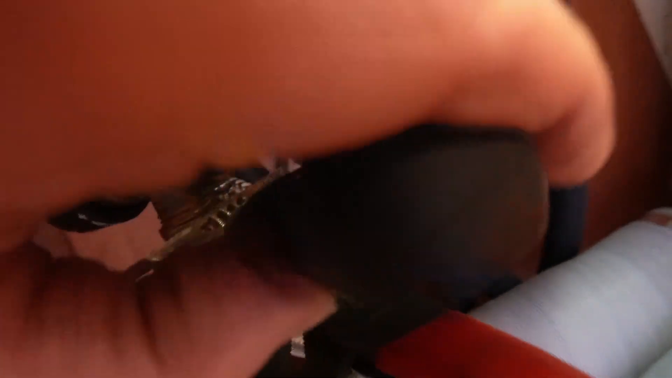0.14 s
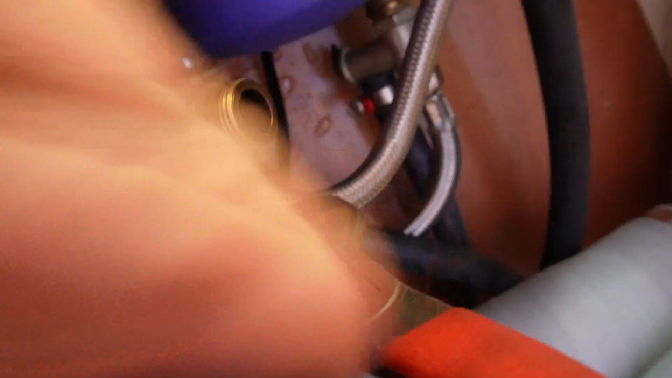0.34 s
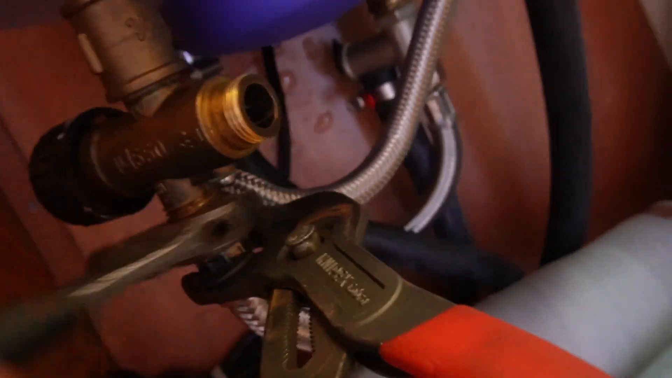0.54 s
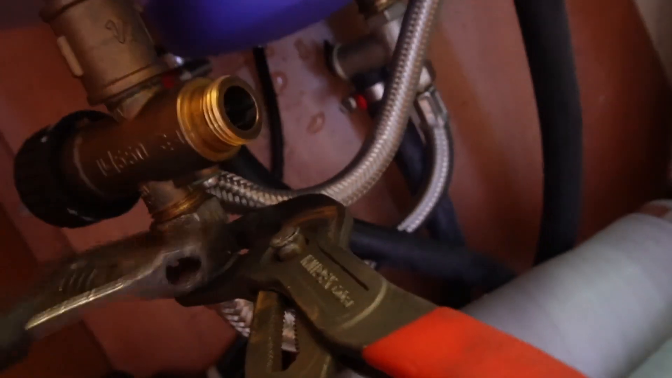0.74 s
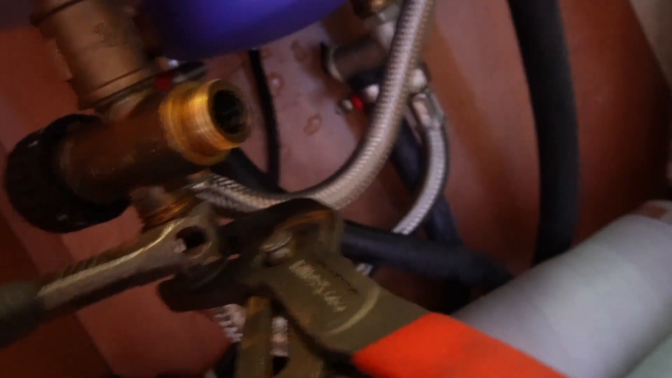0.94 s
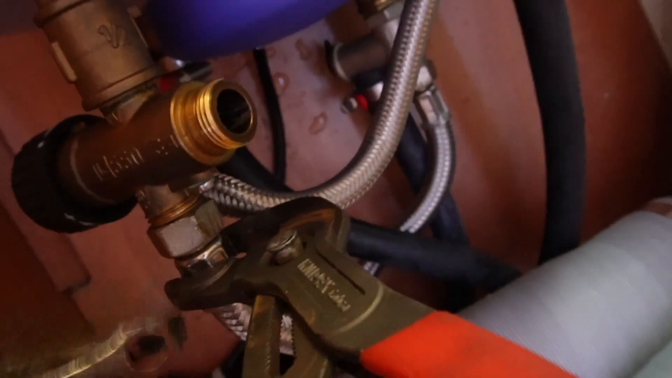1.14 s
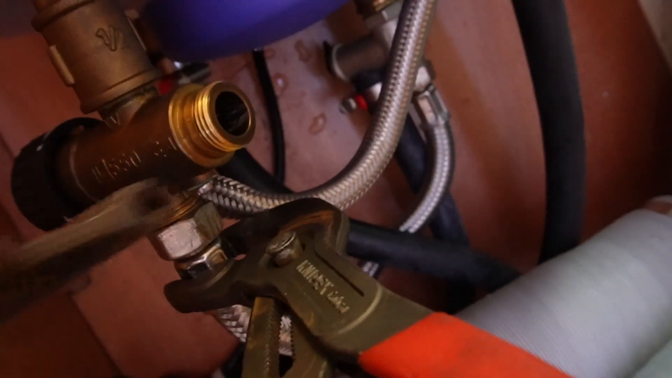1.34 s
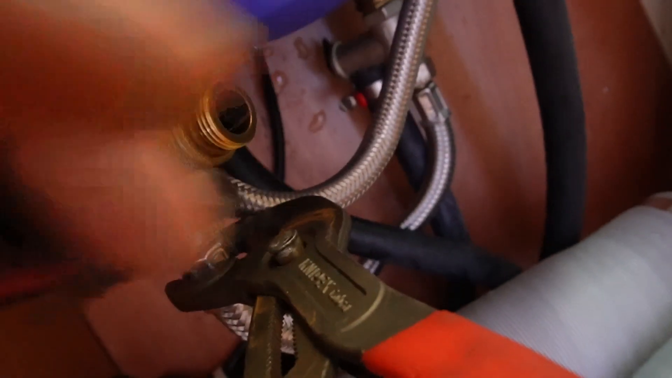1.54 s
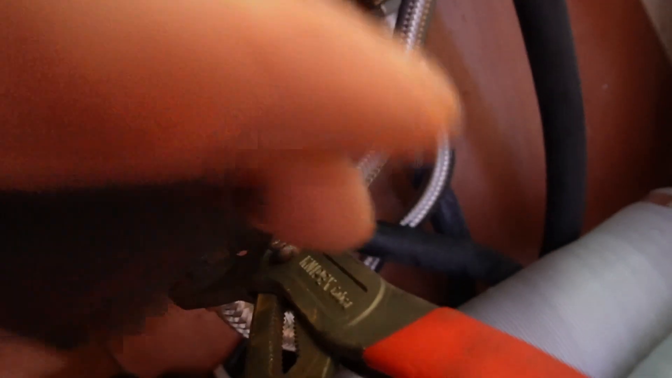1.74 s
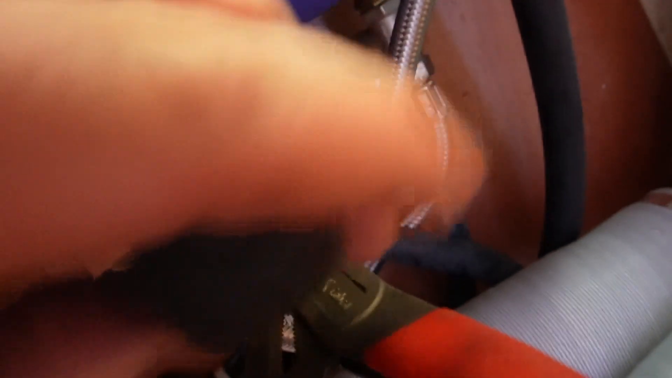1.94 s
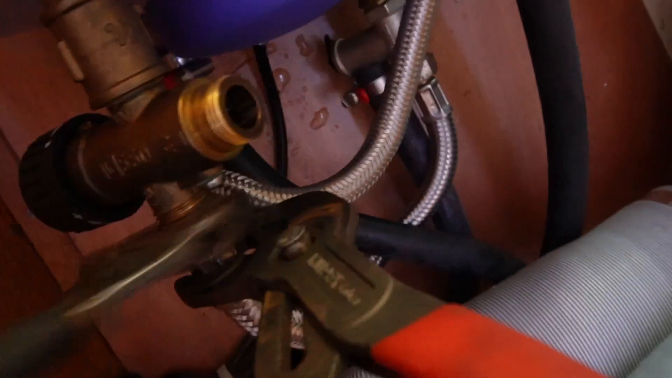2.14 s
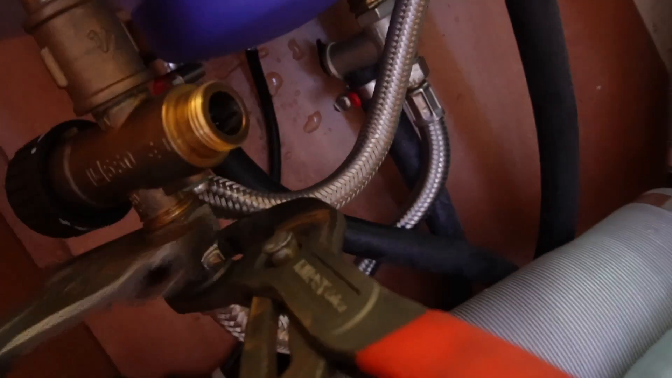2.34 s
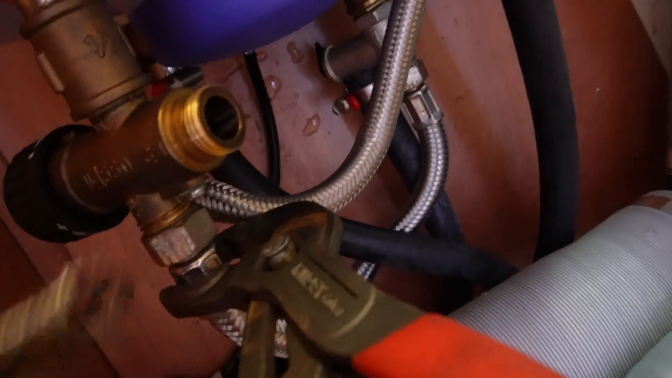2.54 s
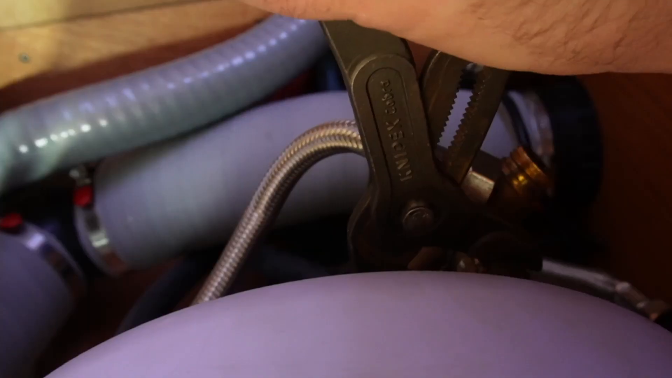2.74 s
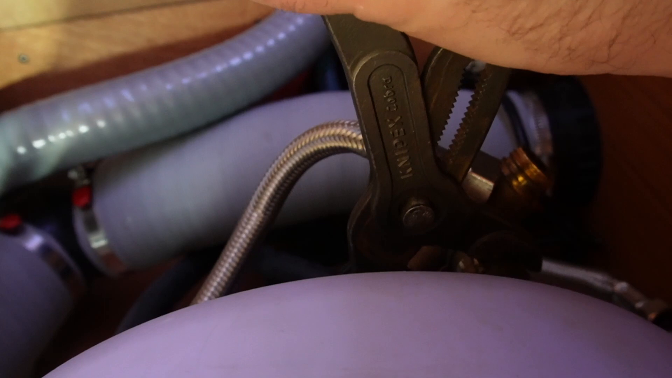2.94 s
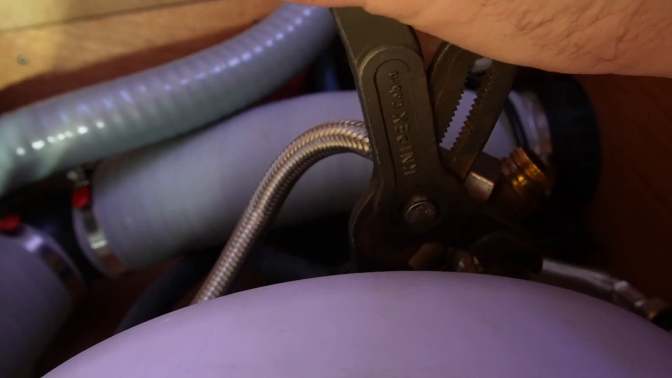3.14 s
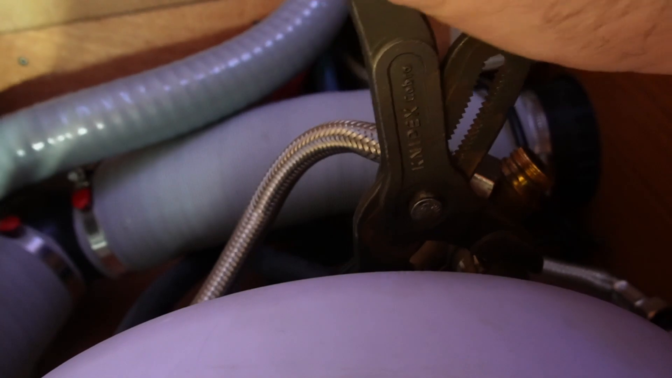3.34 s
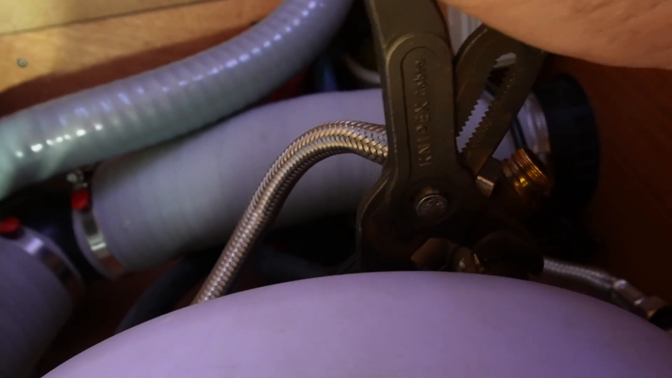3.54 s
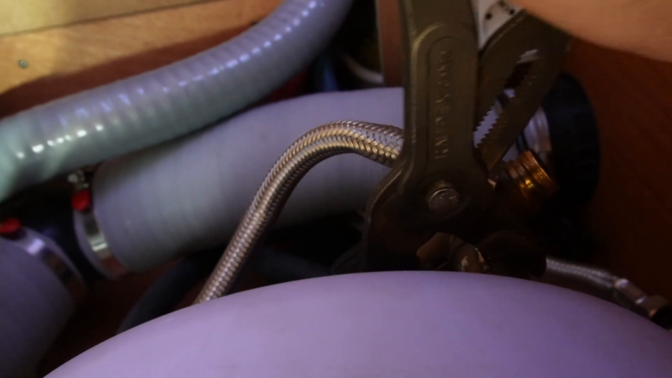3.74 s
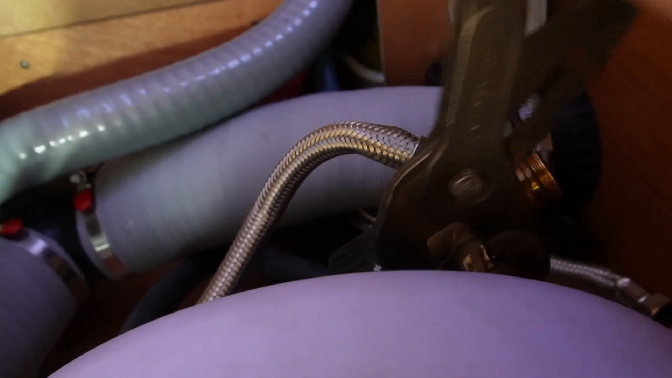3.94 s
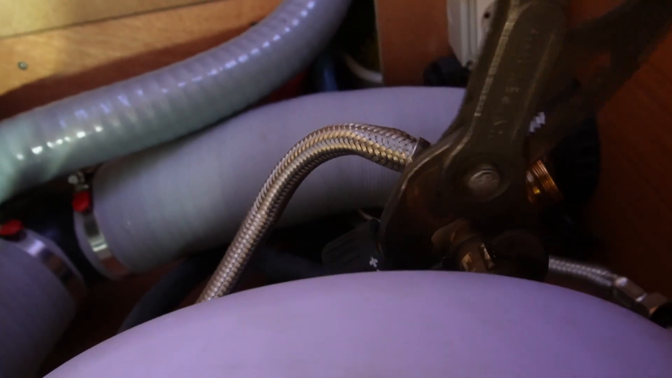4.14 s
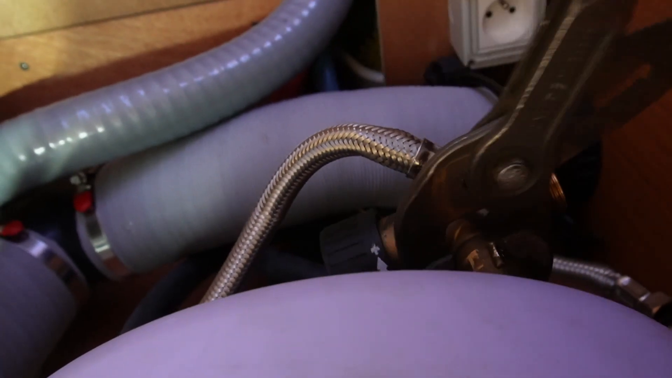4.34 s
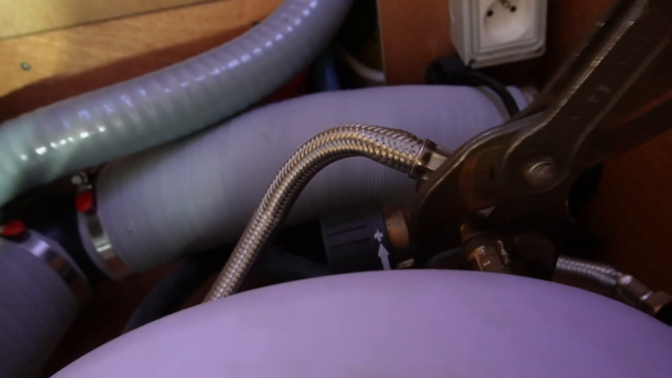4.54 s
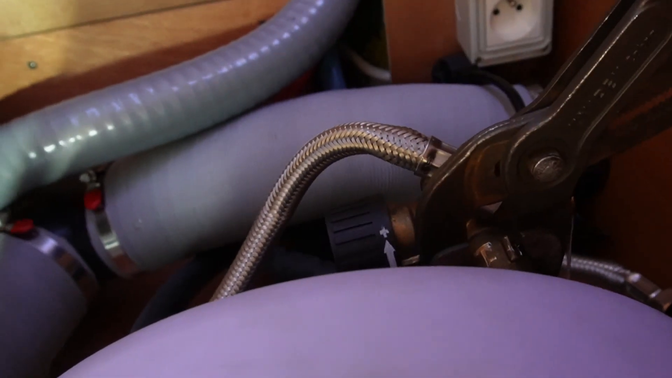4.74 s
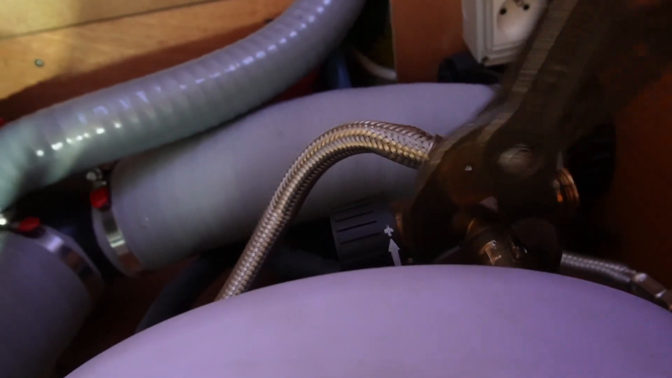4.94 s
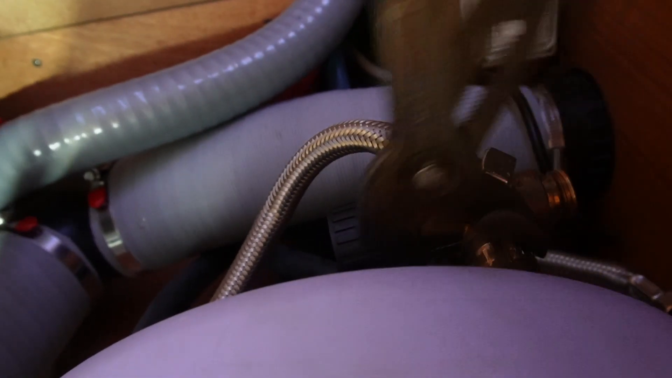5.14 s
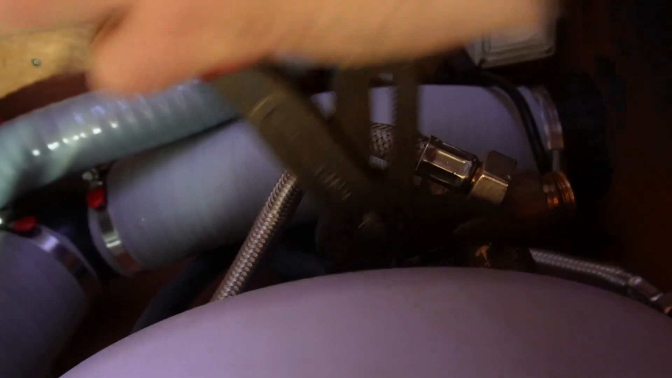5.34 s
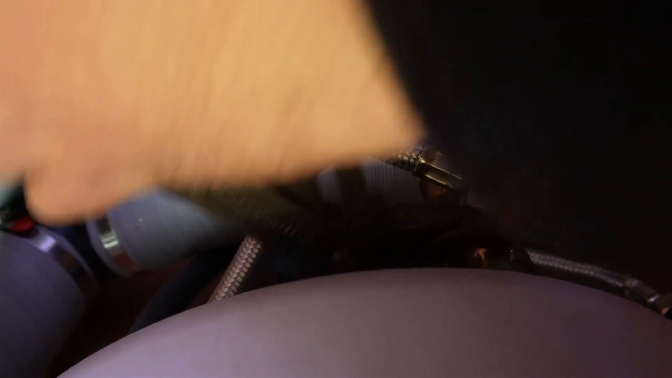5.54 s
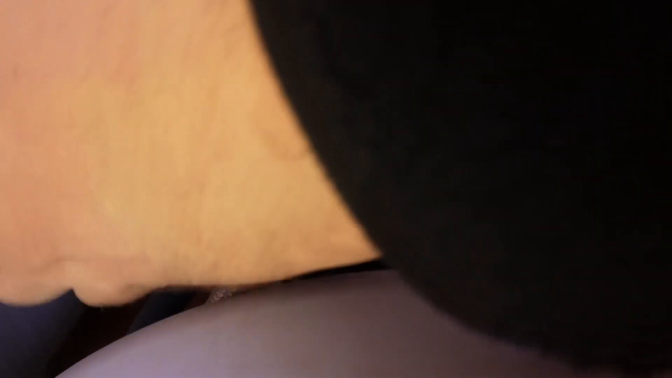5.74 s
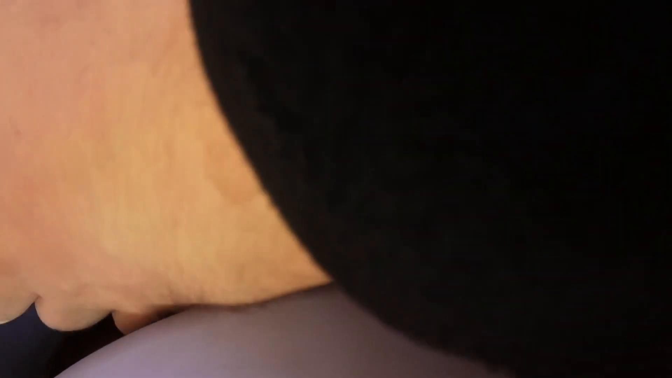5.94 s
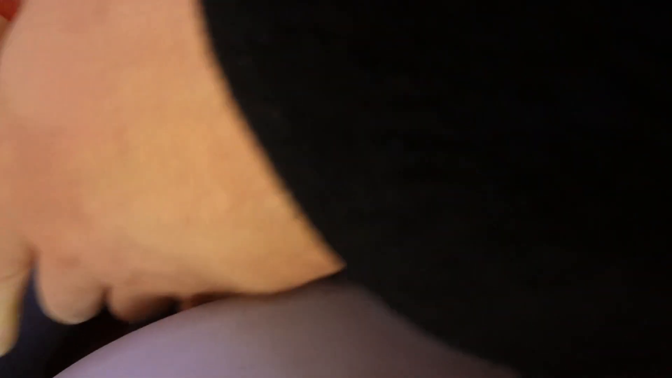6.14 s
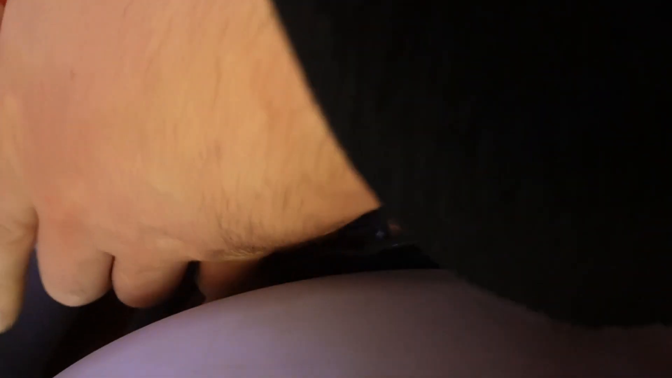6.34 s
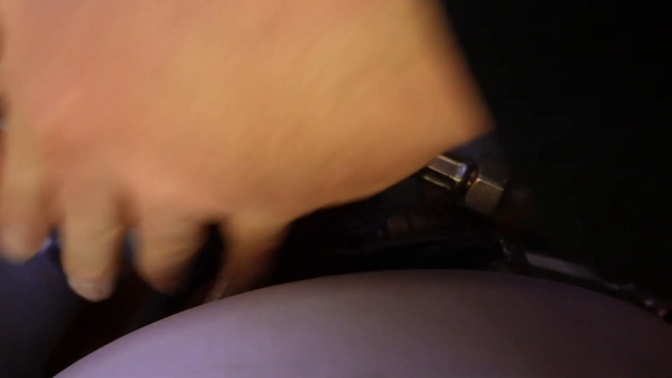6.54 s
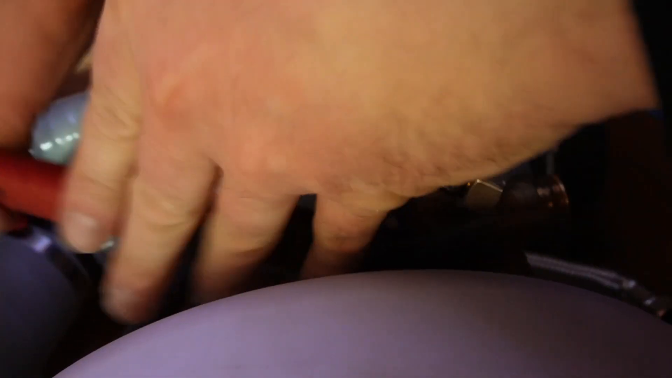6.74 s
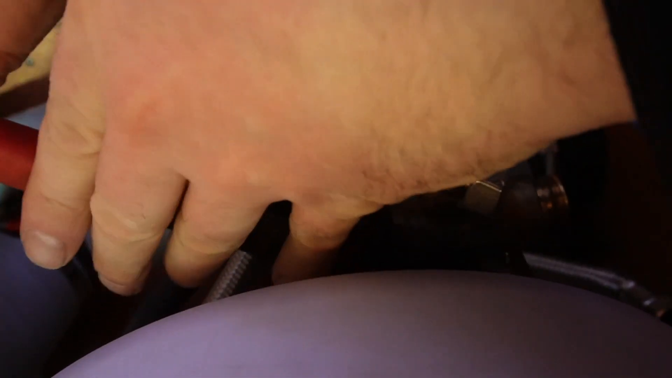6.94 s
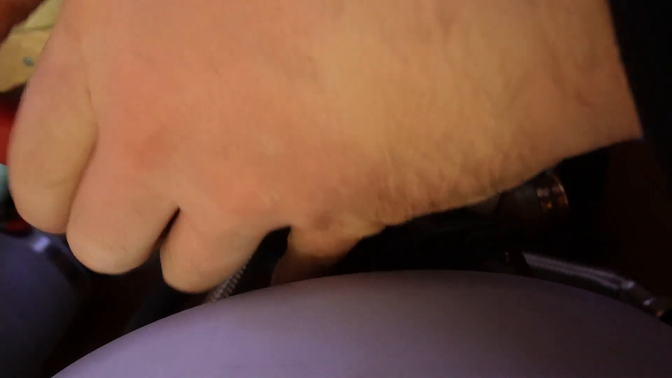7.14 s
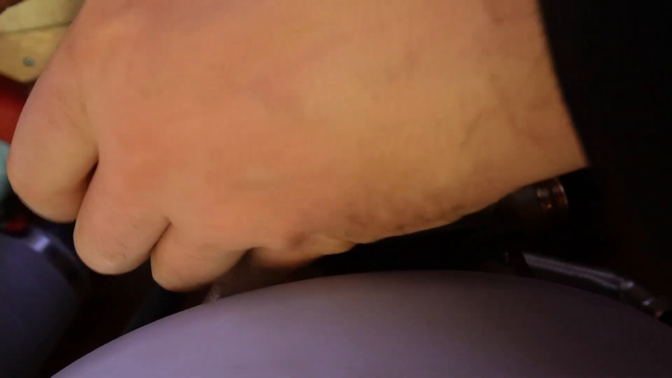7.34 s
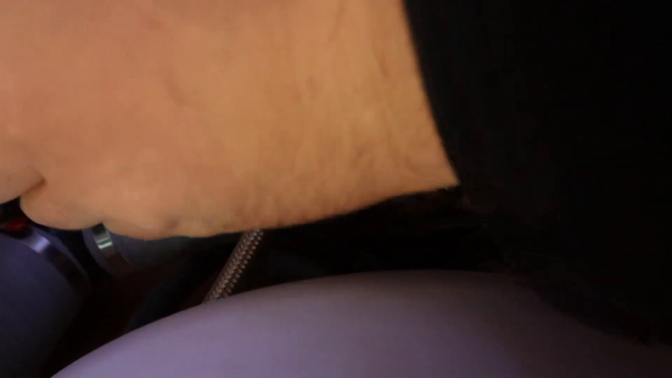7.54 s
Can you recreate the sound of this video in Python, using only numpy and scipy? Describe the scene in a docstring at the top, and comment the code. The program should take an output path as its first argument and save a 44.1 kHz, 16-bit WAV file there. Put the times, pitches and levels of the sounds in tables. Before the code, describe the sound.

A quick double metal knock opens a burst of ringing brass hits, tooth slips and short scrapes. The work pauses almost to silence, then heavy panel booms and a wavering wooden groan follow. Rattling clanks, a buzzing tool joint, soft thumps and sleeve rustle come next, ending with light steel clinks. Close microphone, short boxy locker echo, quiet hum and hiss.

```python
"""A quick pair of hard metallic knocks comes first, then more knocks, scrapes and thumps, very close.
Pliers and a spanner work on brass fittings in a wooden boat locker: each knock is a burst of noise for the
crack, plus fading sine tones for the pipes and the booming panels. Random slips drive resonances for scrapes,
buzzes and creaks; shaped noise makes the rubbing hands and the quiet cabin hiss. The loudest peaks are flattened."""
import sys
import numpy as np
from scipy import signal
from scipy.fft import rfft, irfft, next_fast_len
from scipy.io import wavfile
from scipy.ndimage import uniform_filter1d

SR = 44100
rng = np.random.default_rng(int(sys.argv[2]) if len(sys.argv) > 2 else 0)


def dump(signal):
    """Clip the signal to [-1, 1] and save it as 16-bit WAV at the path in sys.argv[1]."""
    limited = np.clip(np.atleast_2d(signal).T, -1, 1)
    pcm = np.round(limited * 32767).astype(np.int16)
    wavfile.write(sys.argv[1], SR, pcm)


N = 334719  # length [samples]

# Tool blows: (time [s], pipe level [dB], strongest pipe pitch [Hz], crack level [dB], panel level [dB])
KNOCKS = [(0.029, -10.5, 2460, -8.5, -20.5), (0.048, -2.5, 1480, -17, -27), (0.239, -22, 1300, -37, -6),
          (0.276, -9, 1690, -23, -28), (0.291, 1, 1840, -17, -10), (0.331, -5.5, 1880, -26, -19),
          (0.39, -12, 1650, -32, -13.5), (0.637, -6, 1250, -13, -21), (0.721, -16, 1250, -35, -18),
          (0.747, -2.5, 1580, -22, -15), (0.779, -3.5, 1580, -21, -6.5), (1.066, -17, 1220, -44, -17),
          (1.079, -3.5, 1640, -18, -20), (1.425, 2.5, 970, -29, -12.5), (1.547, -6, 1010, -32, -18),
          (1.573, -3.5, 1150, -29, -35), (1.695, 1.5, 1150, -10, -10.5), (1.805, -13, 1470, -22.5, -17),
          (1.825, -7, 2670, -20, -19), (1.862, -4.5, 1270, -30, -24), (1.876, 3, 1400, -19, -11.5),
          (2.015, -8, 1470, -34, -30), (2.187, -2.5, 1340, -16, -10.5), (2.223, -13.5, 570, -30, -21),
          (2.344, -12.5, 1380, -43, -4), (2.397, -6, 1600, -22, -25), (2.469, -29, 1450, -26, -34),
          (2.74, -33, 1010, -36.5, -17.5), (3.299, -31, 1110, -38, -21), (3.954, -33, 1000, -27.5, -5.5),
          (3.99, -13, 930, -24, 3.5), (4.561, -8, 900, -25, 4), (4.75, -21, 855, -31.5, -17),
          (4.862, -30, 1100, -25, -26), (4.932, -16.5, 1210, -25, -21), (5.06, -9, 1090, -41, -1.5),
          (5.104, -2, 1210, -37, -28), (5.147, -1.5, 1200, -16.5, -6), (5.234, -13, 1050, -46, -22),
          (5.251, -6.5, 1030, -43, -6), (5.383, -12, 1680, -29, -4.5), (5.415, -22, 1200, -31, -17),
          (5.446, -15, 1600, -26.5, -28), (5.51, -20.5, 1880, -48, -14), (5.545, -16, 1280, -31, -11),
          (5.578, -20, 1800, -46, -10.5), (5.619, -23, 1700, -35, -8.5), (5.732, -3.5, 1690, -16, -33),
          (5.96, -2.5, 1390, -19.5, -10.5), (6.091, -23.5, 570, -33, -14), (6.268, -19, 1180, -65, -26),
          (6.392, -23.5, 1100, -29, -22.5), (6.503, -16.5, 1150, -38, -42), (6.588, -4.5, 734, -49, -19),
          (6.613, -6.5, 1860, -29, -2), (6.706, -1.5, 1570, -9, -3), (6.735, -3.5, 1300, -24, -1),
          (6.779, -12, 1030, -28, -24), (6.822, -8, 1460, -18, -8.5), (6.861, -6.5, 2610, -19.5, -9),
          (6.973, -11.5, 1150, -28, -34), (7.139, -0.5, 1270, -26, -5), (7.575, -27, 1200, -33, -30)]
# Ringing tones of the brass pipework: (pitch [Hz], relative level [dB])
PIPE_MODES = [(350, -7), (410, -11.5), (490, -4.5), (625, -3.5), (710, -3.5), (862, -0.5), (980, -0.5),
              (1060, -5.5), (1110, -1), (1185, -0.5), (1250, 3.5), (1380, -2.5), (1580, -1.5), (1750, -2.5),
              (1910, 1.5), (1990, -7.5), (2130, -5), (2280, -7), (2470, -5.5), (2600, -3.5), (2800, -14.5),
              (3100, -14)]
# Ringing tones of the locker panels: (pitch [Hz], relative level [dB], time to fall 60 dB when strained [s])
PANEL_MODES = [(115.2, -0.5, 0.38), (133.9, 7, 0.27), (149.3, -3, 0.44), (183.3, 4, 0.48), (202.2, 1, 0.43),
               (223.6, 3, 0.43), (257.4, 4, 0.44)]
# Ringing tones of the tool: (pitch [Hz], relative level [dB], longest time to fall 60 dB [s])
STEEL_MODES = [(2266, -2, 0.04), (2525, -2, 0.038), (3930, -7.5, 0.05), (4294, -3.5, 0.013),
               (5150, -4.5, 0.0026), (6050, -31, 0.11), (6320, -6.5, 0.016), (8560, -3.5, 0.041),
               (9200, -13, 0.05), (12300, -28, 0.023)]
# Tone colour of the crack: (frequency [Hz], relative level [dB])
CRACK_COLOUR = [(880, -33), (1500, 1.5), (2200, 3.5), (5700, -10.5), (8770, -10.5), (10200, -21),
                (12600, -55), (15400, -62), (16500, -25)]
# Teeth and thread slipping: (time [s], peak level [dB])
TICKS = [(0.03, -27), (0.291, -1), (0.561, -24), (1.427, -18), (1.877, -14.5), (2.014, -35), (2.225, -11),
         (4.123, -28), (4.148, -42), (4.169, -23), (4.187, -35), (4.206, -24.5), (4.222, -29), (4.256, -38),
         (4.292, -26), (4.32, -42), (4.358, -40), (4.827, -27.5), (5.018, -23), (5.737, -19),
         (6.059, -25.5), (6.714, -13), (7.147, -15), (7.513, -19)]
# Tone colour of a tick: (frequency [Hz], relative level [dB])
TICK_COLOUR = [(1000, -19), (3000, 5), (6000, 1), (11000, -4), (16000, -28)]
# Clinks of the loose tool: (time [s], level [dB], pitch of the tone struck hardest [Hz])
CLINKS = [(3.767, -13.5, 4900), (3.881, -22, 5230), (3.996, -35, 8600), (4.048, -25, 8600),
          (4.933, -21.5, 8600), (4.965, -27, 8600), (5.059, -22, 4340), (5.09, -32.5, 8600),
          (5.103, -14, 4250), (5.148, -9.5, 4230), (5.148, -12, 6950), (5.152, -23.5, 8800),
          (5.188, -32, 8600), (5.38, -18, 4500), (5.386, -33, 8600), (5.471, -34, 6540), (5.51, -35, 6500),
          (5.539, -29, 6500), (5.735, -24, 3900), (5.958, -16, 4160), (6.706, -17, 3940),
          (6.733, -22, 3950), (6.826, -2.5, 2400), (6.846, -9, 2310), (6.885, -12, 2330), (6.97, -17, 2330),
          (7.535, -17, 5100), (7.559, -7.5, 4920), (7.588, -7, 5200)]
# Loose joint buzzing; the last row, at 7.477, is a bright rustle:
# (time at full [s], last 30 dB of rise [s], hold [s], level [dB], strongest pitch [Hz])
BUZZES = [(0.724, 0.0085, 0.059, -38.5, 8700), (5.06, .01, 0.13, -37, 4320),
          (5.252, 0.021, 0.033, -35.5, 4080), (5.378, .03, 0.47, -41.5, 6300),
          (6.72, 0.027, 0.077, -48, 3970), (6.843, 0.012, 0.13, -32.5, 2330),
          (7.477, 0.095, 0.058, -30, 4860)]
# Pulls and shoves on the tool: (time at full force [s], last 30 dB of rise [s], hold [s], scrape level [dB],
# extra level of upper scrape tones [dB], rub level [dB], panel level [dB], panel pitch [Hz])
PULLS = [(0.038, 0.0085, 0.035, -22, 0, -43, -20, 137), (0.28, 0.068, 0.087, -11.5, 0, -29, -16.5, 192),
         (0.632, 0.003, 0.0038, -7.5, -9, -24.5, -16.5, 161),
         (0.738, 0.049, 0.07, -15.5, -4, -39, -15, 155),
         (0.869, 0.016, 0.0093, -31, -1.5, -41, -20.5, 155.4),
         (1.084, 0.004, 0.022, -19, -2.5, -42, -23, 164), (1.425, .004, 0.071, -16, -24, -55, -30, 156),
         (1.581, 0.22, 0.019, -17.5, -5.5, -35.5, -21.5, 152),
         (1.694, 0.0036, 0.096, -15.5, -3.5, -35, -28.5, 153),
         (1.83, 0.048, 0.061, -8, 0.5, -57, -21.5, 150), (2.013, 0.003, 0.0034, -34.5, 22, -63, -15.5, 147),
         (2.185, 0.0038, 0.057, -18, -20, -26.5, -16.5, 156),
         (2.358, 0.053, 0.062, -16, -1, -27.5, -18.5, 212), (2.767, 0.19, 0.061, -62, 13, -38, -43, 238),
         (3.33, 0.25, 0.071, -41, -13, -46, -33, 223), (3.959, 0.051, 0.057, -14, -10.5, -28, -9.5, 188),
         (4.08, 0.035, 0.44, -31.5, -12, -68, -27.5, 189), (4.561, 0.37, 0.052, -21, -8, -26, -19.5, 230),
         (4.767, 0.1, 0.077, -29.5, -4, -43, -37, 290), (4.893, 0.057, 0.2, -24, -6, -35.5, -14, 249),
         (5.07, 0.035, 0.11, -16.5, -9, -37, -22, 200), (5.21, 0.035, 0.42, -27.5, -5.5, -56, -18.5, 212),
         (5.699, 0.028, 0.061, -16.5, -3, -36.5, -9.5, 208), (5.917, 0.088, 0.026, -47, -3, -32, -25, 203),
         (5.958, 0.0062, 0.039, -17, -14, -50, -13, 209),
         (6.088, 0.052, 0.042, -48, -15, -32.5, -28.5, 183),
         (6.268, .005, 0.022, -44, -16, -46, -25.5, 220), (6.5, 0.051, 0.036, -39, 0, -51, -28, 185),
         (6.586, 0.0081, 0.034, -16, -9, -31.5, -9, 176), (6.703, 0.0037, 0.11, -19.5, -2, -34, -17, 226),
         (6.8, 0.079, 0.082, -10.5, 0, -44, -9, 237), (6.956, 0.068, 0.025, -22.5, -4, -45, -11.5, 199),
         (7.141, 0.011, 0.068, -21, -17, -37.5, -11.5, 191), (7.556, 0.22, .06, -55, 9, -55, -22.5, 178)]
# Hands and hoses rubbing between pulls: (time [s], level [dB], sleeve hiss relative to the rub [dB])
HANDS = [(0, -44, -19), (.2, -52, -25), (0.451, -31, -27), (1.2, -54.5, -12), (1.5, -39.5, -21),
         (2.05, -47, -22), (2.17, -33.5, -26), (2.3, -46, -23), (2.6, -47, -17), (3.657, -43.5, -19),
         (4.15, -39.5, -19), (4.502, -35, -19), (4.62, -33, -23), (4.68, -47, -16), (5.2, -38, -19),
         (5.651, -37.5, -7.5), (5.85, -44.5, -24), (6.0, -42.5, -16), (6.55, -39.5, -16), (6.8, -55, -29),
         (7.06, -46, -18), (7.4, -45, -15), (7.475, -39.5, 0), (7.528, -43, 2), (7.545, -41.5, -17),
         (7.59, -34, 5)]
# Tone colour of the rub: (frequency [Hz], relative level [dB])
RUB_COLOUR = [(70, 0), (180, 5), (300, -1.5), (355, -3.5), (531, -1), (587, -4), (1070, -3), (2840, -13.5),
              (8580, -18.5), (15200, -44), (16500, -68)]
# Groan of a strained panel while the nut turns: (time [s], pitch [Hz], level [dB])
GROAN = [(4.05, 127.7, -30), (4.16, 133.7, -19), (4.2, 124, -27), (4.245, 133.3, -19), (4.32, 125.1, -32.5),
         (4.42, 121.6, -19.5), (4.57, 118.7, -27.5)]
# The two pipe tones that creak along with the groan: (pitch [Hz], pitch [Hz])
CREAK_HZ = (859, 1098)
# Soft thumps and short panel creaks (4.754 and 4.801), each a single fading locker tone:
# (time [s], level [dB], pitch [Hz], time to fall 60 dB [s])
THUMPS_AND_CREAKS = [(0.335, -16, 420, 0.08), (0.612, -7.5, 46.3, 0.18), (2.211, -4, 42.7, 0.32),
                     (2.353, -5.5, 220, 0.21), (4.754, -14, 308, 0.16), (4.801, -22.5, 335, 0.24),
                     (5.39, 4, 201, 0.074)]
# Tone colour of the cabin hiss and hum: (frequency [Hz], relative level [dB])
CABIN_COLOUR = [(18, -37), (30, 11), (46, 4), (70, -0.5), (276, -8), (608, -18), (953, -35), (2740, -50),
                (3480, -25), (4180, -45), (8530, -93), (15200, -45)]
# Faint thin cabin tone: (time [s], level [dB])
WHINE = [(2.6, -70), (2.78, -56), (3.1, -53), (3.4, -77)]

PIPE_T60_S = 0.069  # 60 dB fall of a 1200 Hz pipe tone; higher ones die sooner
LOCKER_T60_S, LOCKER_DB = 0.13, -18  # diffuse echo of the pipes
TICK_S = 0.00079  # a tick's main fade time
UPPER_HZ = 1070  # scrape tones above this follow the upper level
RISE_DB = 30
SCRAPE_FALL_DB_S, RUB_FALL_DB_S, PANEL_FALL_DB_S, BUZZ_FALL_DB_S = 261, 434, 194, 602
SCRAPE_REST_DB, PANEL_REST_DB = -54.5, -64  # levels between pulls
JAW_STEEL_DB, HAND_STEEL_DB = -32.5, -17.5  # steel singing, relative to scrape and hand rub
GROAN_OCTAVE_DB, CREAK_DB = -13.5, -22  # relative to the groan
SWAY_DB, CABIN_DB, WHINE_HZ = -28.5, -45.5, 1740
CEILING, KNEE = .87, 5  # full-scale limit, sharpness of its bend
TOP_HZ = 15900


def knocks():
    """Steel on brass: a crack with a short wash, ringing pipework and a boom that builds a little later."""
    out, t = np.zeros(N), np.arange(SR // 4) / SR
    wash = colour(rng.standard_normal(N), CRACK_COLOUR)
    # the locker walls return the pipe modes as a diffuse blur
    blur = unit(sum(undb(db) * unit(ring(rng.standard_normal(N), hz, 0.021)) for hz, db in PIPE_MODES))
    pipe_t60 = PIPE_T60_S * (1200 / np.array(PIPE_MODES)[:, :1]) ** .5
    panel_t60 = 0.55 * np.array(PANEL_MODES)[:, 2:]
    for s, pipe_db, centre_hz, crack_db, panel_db in KNOCKS:
        i = rng.integers(N - len(t))
        noise = wash[i:i + len(t)]
        share = near(PIPE_MODES, centre_hz, width=0.3, far=0.21)
        pipe = struck(t, PIPE_MODES, share, pipe_t60, scatter_db=4.0, drift=0.016)
        # the jaws chatter, so the ring is ragged
        steps = noise[::128].repeat(128)[:len(t)].clip(-2, 2)
        ragged = undb(2.5 * steps * np.minimum(t / .004, 1))
        tail = undb(LOCKER_DB) * blur[i:i + len(t)] * fade(t, LOCKER_T60_S)
        pipe = (pipe * uniform_filter1d(ragged, size=96) + tail) * (1 - np.exp(-t / 0.0003))
        crack_fade = np.exp(-t / 0.00014) + undb(-3.0) * np.exp(-t / 0.0041) + undb(-9.5) * np.exp(-t / 0.009)
        crack = noise * crack_fade * (1 - np.exp(-t / 0.00011))
        boom = struck(t, PANEL_MODES, 1, panel_t60, scatter_db=4.5, drift=0.013)
        boom = boom * (1 - np.exp(-t / 0.0055)) ** 2
        add(out, s, undb(pipe_db) * pipe + undb(crack_db) * crack + undb(panel_db) * boom)
    return out


def ticks():
    """Teeth and thread slip: each tick is bright noise with a very short fade and a weaker, longer one."""
    out, t = np.zeros(N), np.arange(SR // 50) / SR
    for s, db in TICKS:
        fall = np.exp(-t / TICK_S) + undb(-12) * np.exp(-t / 0.0037)
        x = colour(rng.standard_normal(len(t)), TICK_COLOUR) * fall
        add(out, s, undb(db) * x / np.max(np.abs(x)))
    return out


def clinks(t):
    """Bright clinks of the tool steel; loose parts touch it, so no clink rings clean."""
    out, short, steel = np.zeros(N), t[:SR // 8], np.array(STEEL_MODES)
    for s, db, hz in CLINKS:
        # cancel the table's own levels, so the chosen mode leads
        share = near(STEEL_MODES, hz, width=.05, far=0) / undb(steel[:, 1:2]) + .015
        x = struck(short, STEEL_MODES, share, steel[:, 2:], scatter_db=2, drift=.008)
        add(out, s, undb(db) * x * (1 - np.exp(-short / .00012)))
    return undb(3 * walk(250)) * out


def buzzes():
    """The tool's loose joint buzzes, and a bright rustle comes last: tiny slips drive the bright modes."""
    level_db, pitch_hz = np.array(BUZZES)[:, 3:].T
    level, centre_hz = force(undb(level_db), BUZZES, BUZZ_FALL_DB_S, colour_of=pitch_hz)
    buzz = np.zeros(N)
    for share, (hz, db, t60) in zip(near(STEEL_MODES, centre_hz, width=0.095, far=0.085), STEEL_MODES):
        mode = unit(ring(grit(2500, 3.3), hz, t60 / 3.5))
        buzz += share * undb(db + 3 * walk(25)) * mode
    return buzz * level


def scrape(upper_db):
    """Toothed jaws slip over brass in bursts; big slips strike every mode at once, small ones single modes."""
    out = np.zeros(N)
    burst = undb(3 * walk(45))
    jolts = undb(-3) * unit(grit(200, 3.5))
    for hz, db in PIPE_MODES:
        upper = np.clip(np.log2(hz / UPPER_HZ), 0, 1) * upper_db
        slips = burst * (unit(grit(900, 4.8)) + rng.choice([-1, 1]) * jolts)
        mode = unit(ring(slips, hz, 0.038 * (1200 / hz) ** .5))
        out += undb(db + 4.1 * walk(13) + upper - 18.0) * mode
    return out


def sing():
    """The upper steel modes, kept faintly alive by friction, each rising and falling."""
    return unit(sum(undb(db + 5 * walk(9)) * unit(ring(grit(3000, 3), hz, min(t60, .006)))
                    for hz, db, t60 in STEEL_MODES if hz > 3500))


def panels(pitch_hz):
    """Uneven strain keeps the panel modes nearest the loaded spot humming, at an even total mode power."""
    jerky = undb(3.56 * walk(20))
    share = near(PANEL_MODES, pitch_hz, width=0.21, far=0.24) * undb(np.array(PANEL_MODES)[:, 1:2])
    hum = sum(g * unit(ring(jerky * rng.standard_normal(N), hz, t60))
              for g, (hz, db, t60) in zip(share, PANEL_MODES))
    hum = signal.sosfilt(signal.butter(2, 95, "high", fs=SR, output="sos"), hum)
    return hum / np.sqrt(np.sum(share ** 2, axis=0))


def groan(t):
    """A low wavering tone with its octave throbs as the thread sticks; slips keep two pipe modes creaking."""
    hz, db = curves(t, GROAN)
    phase = 2 * np.pi * np.cumsum(hz * (1 + .03 * walk(25))) / SR
    on = uniform_filter1d(1. * (t > GROAN[0][0]) * (t < GROAN[-1][0]), size=1500)
    octave = undb(GROAN_OCTAVE_DB + 4.4 * walk(12)) * np.sin(2 * phase)
    tone = np.sqrt(2) * (np.sin(phase) + octave)
    creak = sum(unit(ring(grit(900, 3), 1. * f, .1)) for f in CREAK_HZ)
    return on * undb(db + 2 * walk(20)) * (tone + undb(CREAK_DB) * creak)


def thumps_and_creaks():
    """Soft thumps and short panel creaks: each is a single locker tone that swells quickly and fades."""
    out, t = np.zeros(N), np.arange(SR) / SR
    for s, db, hz, t60 in THUMPS_AND_CREAKS:
        add(out, s, -undb(db) * np.sin(2 * np.pi * hz * t) * fade(t, t60) * (1 - np.exp(-t / 0.0047)))
    return out


def rub(sleeve_db):
    """Skin, braid and hose slide over each other in strokes; a sleeve adds a finer hiss."""
    x = undb(1.5 * walk(30)) * (rng.standard_normal(N) + .4 * unit(grit(500, 3)))
    sleeve = signal.sosfilt(signal.butter(3, 9000, "high", fs=SR, output="sos"), x)
    return colour(x, RUB_COLOUR) + undb(sleeve_db) * unit(sleeve)


def sway(strain):
    """The microphone sways below hearing, more when the locker is pushed."""
    return undb(SWAY_DB) * strain ** 0.14 * unit(ring(rng.standard_normal(N), 18.7, 0.77))


def cabin(t):
    """Quiet hiss and hum of the boat as shaped noise, and a faint wavering tone that stops."""
    whine_gain = undb(np.interp(t, *np.transpose(WHINE), right=-np.inf))
    tone = unit(ring(rng.standard_normal(N), WHINE_HZ, 0.082)) * whine_gain
    swell_db = 1.5 * walk(3)
    return undb(CABIN_DB + swell_db) * colour(rng.standard_normal(N), CABIN_COLOUR) + tone


def struck(t, modes, share, t60, scatter_db, drift):
    """Free ringing of a mode table, peak 1; every blow lands elsewhere and stirs another mix."""
    hz, db = np.transpose(modes)[:2, :, None]
    draw = rng.standard_normal((3, len(modes), 1))
    gain = share * undb(db + scatter_db * draw[0])
    phase = 2 * np.pi * hz * (1 + drift * draw[1]) * t + 2 * np.pi * draw[2]
    x = np.sum(gain * np.sin(phase) * fade(t, t60), axis=0)
    return x / np.max(np.abs(x))


def near(modes, centre_hz, width, far):
    """How strongly a force centred on one pitch reaches each mode."""
    return far + np.exp(-(np.log(np.array(modes)[:, :1] / centre_hz) / width) ** 2)


def efforts(t, table, fall_db_s):
    """Gain of each (time, rise, hold, ..) row over time: a swell, a hold, a steady fall in dB."""
    s, rise, hold = np.array(table)[:, :3].T[:, :, None]
    early = np.maximum(s - t, 0) / np.maximum(rise, .001)
    return undb(-RISE_DB * early - fall_db_s * np.maximum(t - s - hold, 0))


def force(gain, table, fall_db_s, rest_db=-90, colour_of=None):
    """Summed gain of all efforts over a resting level, and a column averaged by their power."""
    coarse = np.arange(0, N, 32)  # sample numbers; the gaps are filled by straight lines
    power = (gain[:, None] * efforts(coarse / SR, table, fall_db_s)) ** 2 + 1e-18
    total = power.sum(axis=0)
    mean = total if colour_of is None else colour_of @ power / total
    level = np.sqrt(total + undb(rest_db) ** 2)
    return [np.interp(np.arange(N), coarse, v) for v in (level, mean)]


def grit(rate, spread_db):
    """Irregular tiny slips, about rate per second: a few large, many small."""
    chance, side, size = rng.random((3, N))
    size_db = np.minimum(-spread_db * np.log(1 - size), 17)
    return (chance < rate / SR) * np.sign(side - .5) * undb(size_db)


def walk(rate):
    """Random levels 1 / rate seconds apart, joined by straight slopes; rms 1."""
    k = int(SR / rate)
    return unit(uniform_filter1d(np.repeat(rng.standard_normal(N // k + 1), k), k)[:N])


def ring(x, hz, t60):
    """One damped mode driven by x: a resonance that falls 60 dB in t60 seconds."""
    r = np.exp(-np.log(1000) / (t60 * SR))
    angle = 2 * np.pi * hz / SR
    return signal.lfilter([np.sin(angle)], [1, -2 * r * np.cos(angle), r * r], x)


def colour(x, points):
    """x shaped by a (frequency [Hz], level [dB]) spectrum, rms 1."""
    hz, db = np.transpose(points)
    n = next_fast_len(len(x))
    f = np.maximum(np.arange(n // 2 + 1) * SR / n, 1)
    gain = undb(np.interp(np.log(f), np.log(hz), db))
    return unit(irfft(rfft(x, n) * gain, n)[:len(x)])


def fade(t, t60):
    """Exponential fade that falls 60 dB in t60 seconds."""
    return np.exp(-np.log(1000) * t / t60)


def curves(t, table):
    """The columns of a (time, value, ..) table at times t."""
    s, *columns = np.transpose(table)
    return [np.interp(t, s, c) for c in columns]


def undb(db):
    """dB to gain."""
    return 10 ** (np.asarray(db) / 20)


def unit(x):
    """x at rms 1."""
    return x / np.sqrt(np.mean(x ** 2))


def add(out, s, x):
    """Mix x into out from time s."""
    i = int(s * SR)
    out[i:i + len(x)] += x[:N - i]


def scene():
    """Blows, friction and strain over the cabin hiss; the pulls drive scrape, rub and panels together."""
    t = np.arange(N) / SR
    scrape_db, upper_db, rub_db, panel_db, panel_hz = np.array(PULLS)[:, 3:].T
    jaws, upper = force(undb(scrape_db), PULLS, SCRAPE_FALL_DB_S, SCRAPE_REST_DB, upper_db)
    strain, pitch_hz = force(undb(panel_db), PULLS, PANEL_FALL_DB_S, PANEL_REST_DB, panel_hz)
    hiss_db, sleeve_db = curves(t, HANDS)
    pull_rub = force(undb(rub_db), PULLS, RUB_FALL_DB_S)[0]
    hands = np.hypot(pull_rub, undb(hiss_db)) * rub(sleeve_db)
    touch = np.hypot(undb(JAW_STEEL_DB) * jaws, undb(HAND_STEEL_DB + hiss_db))
    short_sounds = knocks() + ticks() + clinks(t) + buzzes() + thumps_and_creaks()
    work = jaws * scrape(upper) + touch * sing() + strain * panels(pitch_hz) + groan(t) + hands
    return (short_sounds + work + sway(strain) + cabin(t))[None]


def record(dry):
    """The input stage flattens the loudest peaks; a steep filter cuts the top."""
    flat = dry / (1 + np.abs(dry / CEILING) ** KNEE) ** (1 / KNEE)
    return signal.sosfilt(signal.ellip(10, .2, 80, TOP_HZ, fs=SR, output="sos"), flat)


dry = scene()
out = record(dry)
dump(out)
```